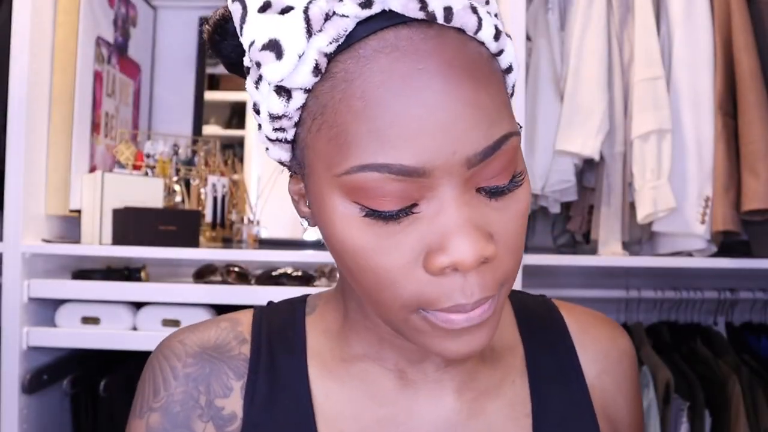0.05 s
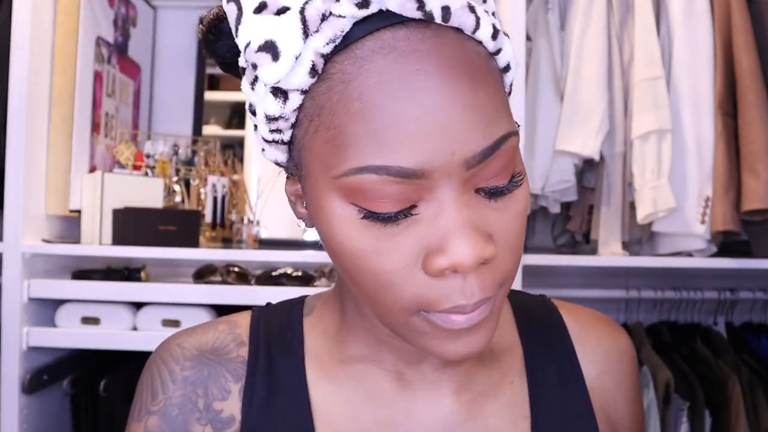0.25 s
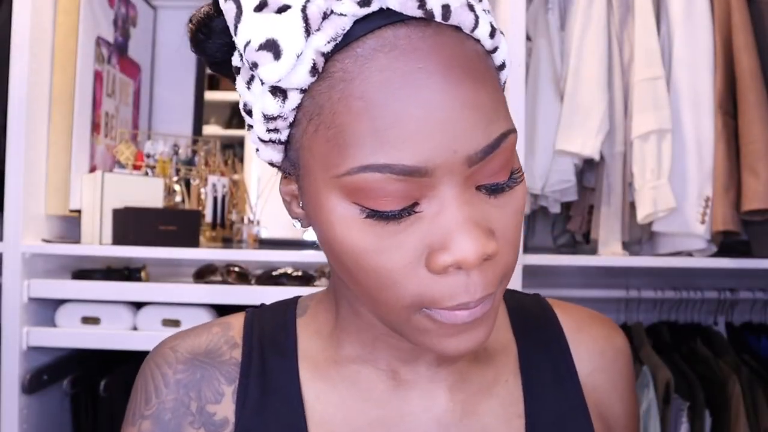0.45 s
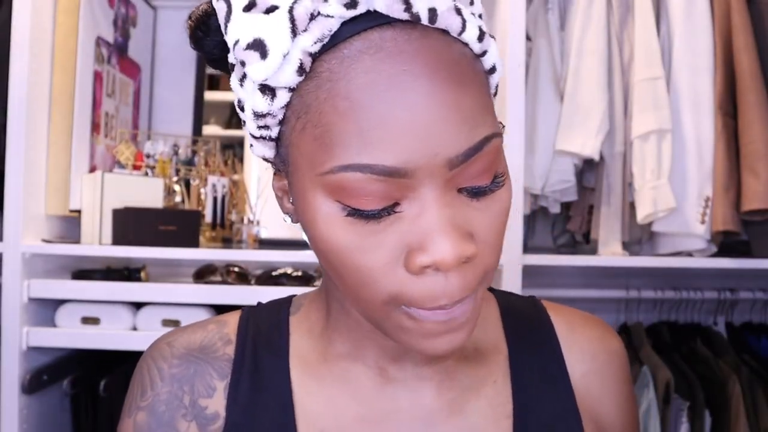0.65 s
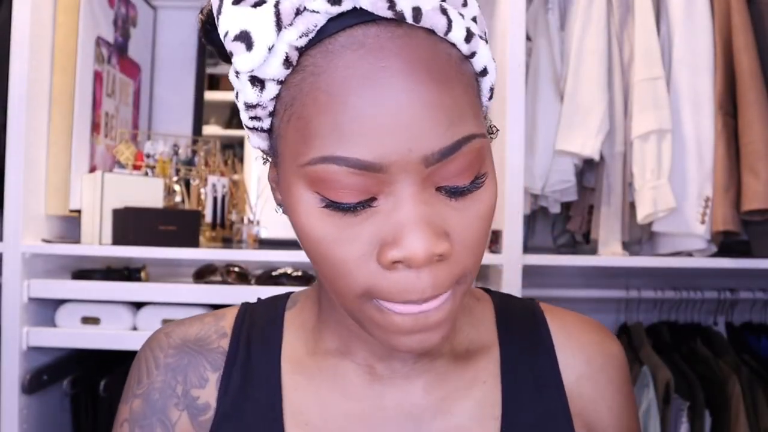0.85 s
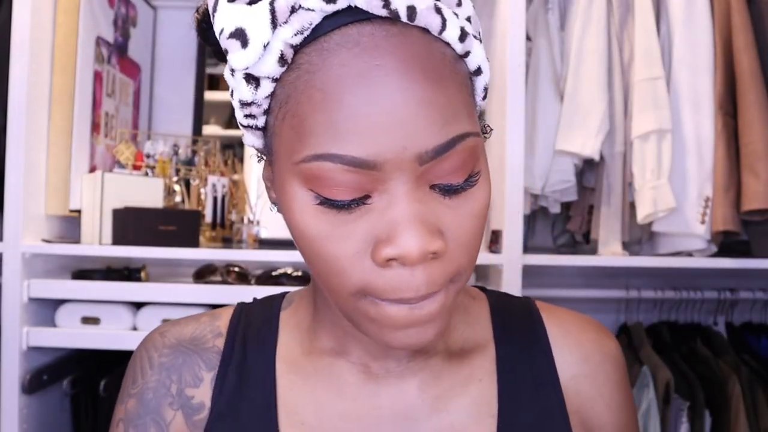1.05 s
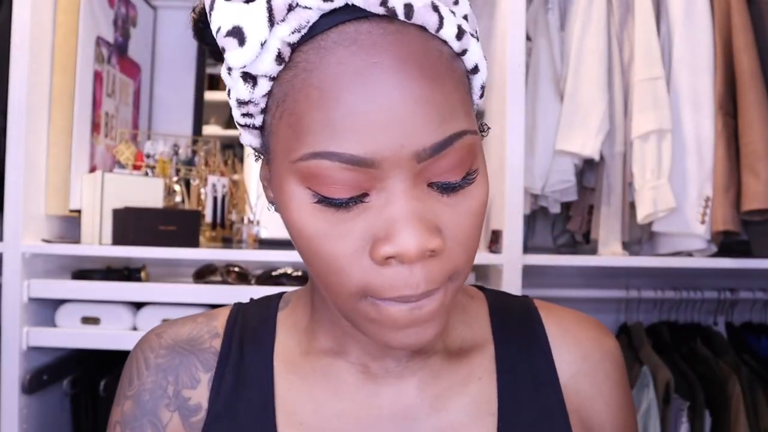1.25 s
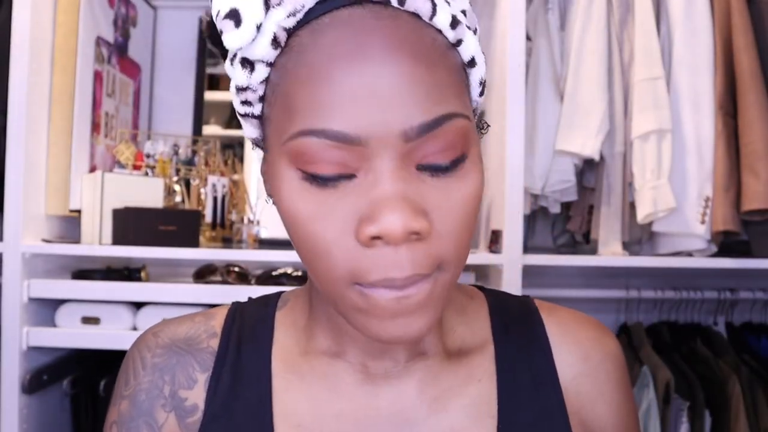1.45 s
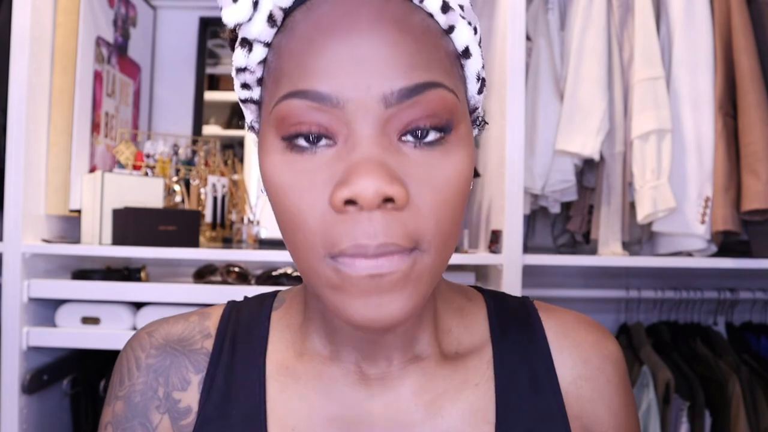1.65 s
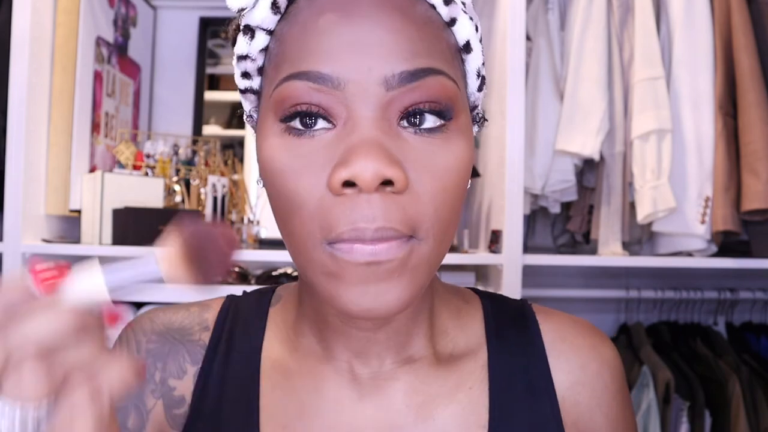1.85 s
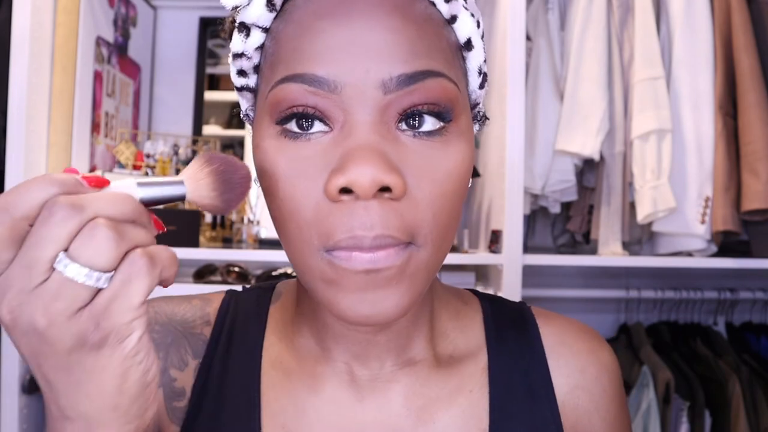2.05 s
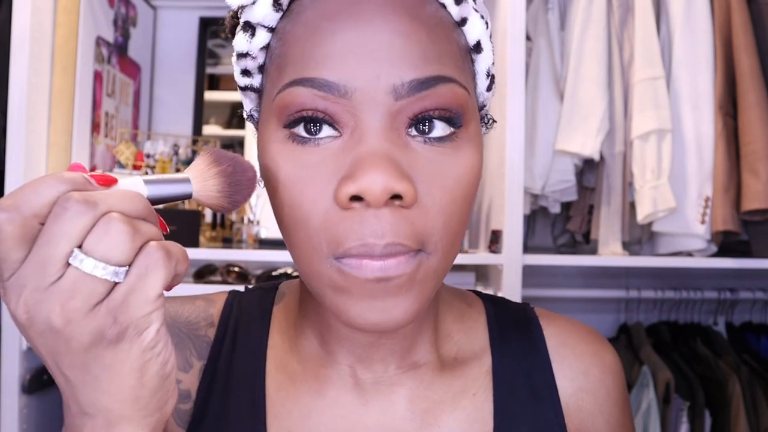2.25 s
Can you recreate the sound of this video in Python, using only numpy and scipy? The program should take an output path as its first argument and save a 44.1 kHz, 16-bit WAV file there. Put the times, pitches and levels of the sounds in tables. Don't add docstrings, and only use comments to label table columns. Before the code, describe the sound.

A plastic compact clatters on a hollow tabletop close to wide stereo microphones: light taps at 0.03-0.07 s, a sharp knock at 0.19, then a dense, loud, clipping rattle from 0.22 to 0.33. A soft knock settles at 0.39. Lid ticks follow at 0.55 and 0.66. Very faint brush sweeps run 0.9-1.8, a faint tick at 1.76, sleeve rustle near 1.9, over quiet furnished-room hum.

```python
import sys
import numpy as np
from scipy import signal
from scipy.fft import rfft, irfft
from scipy.io import wavfile

SR = 44100
rng = np.random.default_rng(int(sys.argv[2]) if len(sys.argv) > 2 else 0)


def level_to_linear(level):
    exponent = np.asarray(level, float) / 20
    return 10 ** exponent


def bounce(signal):
    frames = np.transpose(np.atleast_2d(signal))
    limited = np.clip(frames, -1, 1)
    pcm = np.round(limited * 32767).astype(np.int16)
    wavfile.write(sys.argv[1], SR, pcm)


N = 101121


def rms_one(x):
    return x / np.sqrt(np.mean(x ** 2) + 1e-20)


def at_hz(points, hz):
    table_hz, value = np.transpose(points)
    return np.interp(np.log(np.maximum(hz, 1)), np.log(table_hz), value)


def colour(x, spectrum):
    size = 4096
    log_gain = at_hz(spectrum, np.arange(size // 2 + 1) * SR / size) * np.log(10) / 20
    cepstrum = irfft(log_gain)
    cepstrum[1:size // 2] *= 2
    cepstrum[size // 2 + 1:] = 0
    kernel = irfft(np.exp(rfft(cepstrum)))
    kernel = kernel / np.sqrt(np.sum(kernel ** 2))
    return signal.fftconvolve(x, kernel)[:len(x)]


def filtered(x, order, hz, kind):
    return signal.sosfilt(signal.butter(order, hz, kind, fs=SR, output="sos"), x)


def add(out, s, x):
    i = max(int(s * SR), 0)
    out[i:i + len(x)] += x[:len(out) - i]


def swells(rows):
    t = np.arange(N) / SR
    power = sum(level_to_linear(db) ** 2 * np.exp(-((t - s) / (length / 2)) ** 2) for s, length, db in rows)
    return np.sqrt(power)


def ring(x, hz, t60):
    r, w = level_to_linear(-60 / (t60 * SR)), 2 * np.pi * hz / SR
    return signal.lfilter([0, np.sin(w)], [1, -2 * r * np.cos(w), r * r], x + 1e-18)


def struck(hits, modes):
    spread_db, longest_ring_s, push_hz = 2, 0.24, 1600
    shape = (len(hits), len(modes))
    spread, late = rng.standard_normal(shape), rng.random(shape)
    s, db = np.transpose(hits)
    out = 0
    for k, (hz, level_db, t60) in enumerate(modes):
        force = np.zeros(N)
        at = ((s + late[:, k] / hz) * SR).astype(int)
        np.add.at(force, at, level_to_linear(db + level_db + spread_db * spread[:, k]))
        out = out + ring(force, hz, min(t60, longest_ring_s))
    return filtered(out, 2, push_hz, "low")


def contact(length_s, fall_s, spike_db):
    first_touch, sag_s = 2.5, 0.008
    t = np.arange(1024) / SR
    spikes = level_to_linear(spike_db * rng.standard_normal(len(t) // 16).repeat(16))
    grit = rng.standard_normal(len(t)) * spikes
    grit[0] = first_touch
    return grit * np.exp(-t / sag_s - np.maximum(t - length_s, 0) / fall_s)


def hum():
    # frequency in Hz, level in dB per Hz.
    mid_tone = [(12, -27), (20, -9), (50, -2.5), (319, -10), (398, -11), (484, -11.5), (753, -15),
                (6720, -33), (15000, -57.5)]
    # frequency in Hz, level in dB per Hz.
    side_tone = [(12, -50.5), (20, -12), (286, 0), (603, -3), (796, -3), (5240, -17.5), (11100, -27.5),
                 (13100, -30.5), (15000, -55.5)]
    mid_db, side_db, patchy_db = -61.5, -61, 0.3
    lumps = np.interp(np.arange(N), np.linspace(0, N, 40), rng.standard_normal(40))
    tones = []
    for spectrum, db in [(mid_tone, mid_db), (side_tone, side_db)]:
        noise = rng.standard_normal(N + 4096)
        settled = colour(noise, spectrum)[4096:]
        tones.append(level_to_linear(db) * rms_one(settled))
    return level_to_linear(patchy_db * lumps) * np.array(tones)


def room(x):
    # frequency in Hz, t60 in seconds.
    decay = [(200, 0.15), (1000, 0.23), (4000, 0.16), (12000, 0.12)]
    # frequency in Hz, level in dB.
    tint = [(200, -5), (700, -7.5), (2000, -1.5), (4000, -0.5)]
    level_db, rise_s, early_db, early_s = -10, 0.004, 1, 0.002
    t = np.arange(SR // 2) / SR
    out = []
    for _ in range(2):
        tail = 0
        for hz in 125 * 2. ** np.arange(8):
            edges = [hz / np.sqrt(2), min(hz * np.sqrt(2), .45 * SR)]
            band = filtered(rng.standard_normal(len(t)), 2, edges, "band")
            tail = tail + band * level_to_linear(at_hz(tint, hz) - 60 * t / at_hz(decay, hz))
        tail = tail * (1 - np.exp(-t / rise_s)) * (1 + level_to_linear(early_db) * np.exp(-t / early_s))
        tail = tail / np.sqrt(np.sum(tail ** 2))
        out.append(level_to_linear(level_db) * signal.fftconvolve(x, tail)[:N])
    return np.array(out)


def sleeve():
    # frequency in Hz, level in dB per Hz.
    cloth = [(600, -24), (1500, -4.5), (2500, 0), (4000, -14.5), (8000, -35)]
    swell = swells([(1.92, 0.36, -69.5)])
    return swell * np.array([rms_one(colour(noise, cloth)) for noise in rng.standard_normal((2, N))])


def leftover():
    # frequency in Hz, level in dB, t60 in seconds.
    rings = [(70, -60, 0.038), (194, -26.5, 0.093), (394, -46, 0.19), (794, -44, 0.17)]
    age_s = 0.0006
    t = np.arange(N) / SR + age_s
    return sum(level_to_linear(db - 60 * t / t60) * np.sin(2 * np.pi * hz * t) for hz, db, t60 in rings)


def bump():
    at_s, hz, level_db = 0.48, 40, -50
    cycles = (np.arange(N) / SR - at_s) * hz
    return level_to_linear(level_db) * np.sin(2 * np.pi * cycles) * np.exp(-2 * cycles ** 2)


def hollow_top():
    # start in seconds, level in dB.
    taps = [
        (0.041, -36.5),
        (0.062, -45.5),
    ]
    # frequency in Hz, level in dB, t60 in seconds.
    hollow = [(427, -0.5, 0.135), (810, -12, .22)]
    return struck(taps, hollow)


def finger_drag():
    # centre in seconds, length in seconds, level in dB rms.
    drags = [
        (0.01, .03, -54),
        (0.063, .05, -64.5),
        (0.132, .06, -60.5),
        (0.21, .025, -50),
        (0.294, .04, -39.5),
        (0.309, .012, -38.5),
    ]
    # frequency in Hz, level in dB per Hz.
    skin = [(500, -13), (1200, -2), (2500, 0), (4200, 2.5), (6000, -9.5), (12000, -18.5), (15000, -35)]
    side_db = 4.5
    slips = rng.standard_normal((2, N)) * (.3 + 2 * (rng.random((2, N)) < .05))
    mid, side = (swells(drags) * rms_one(colour(grit, skin)) for grit in slips)
    return np.array([mid, level_to_linear(side_db) * side])


def brush():
    # centre in seconds, length in seconds, level in dB rms.
    strokes = [
        (0.89, .05, -74),
        (1.11, .07, -71),
        (1.295, .07, -68),
        (1.36, .06, -73),
        (1.48, .06, -71),
        (1.695, .06, -72),
        (1.8, .08, -75),
    ]
    # frequency in Hz, level in dB.
    bristle = [(2500, -20), (4500, -4), (6000, 0), (9000, 0), (12000, -3), (13500, -12), (15000, -25)]
    flicks_per_s, mid_db, side_db = 7300, -12, 0
    flicks = rng.standard_normal((2, N)) * (0.21 + (rng.random((2, N)) < flicks_per_s / SR))
    mid, side = (rms_one(colour(f, bristle)) for f in flicks)
    return swells(strokes) * np.array([level_to_linear(mid_db) * mid, level_to_linear(side_db) * side])


def ticks():
    # start in seconds, peak in dB, centre in Hz, grit in dB.
    snaps = [
        (0.5451, -28, 10480, -7),
        (0.6599, -18, 5500, -21),
        (1.7623, -33, 6000, -17),
    ]
    # frequency in Hz, level in dB, t60 in seconds.
    lid = [(2250, -21, 0.015), (2550, -21, .012)]
    low_hz, width_octaves, fall_s = 2000, 1.1, 0.0018
    echo_s, echo_db = 0.0072, -19
    out = np.zeros(N)
    for s, db, hz, grit_db in snaps:
        kick = np.r_[1., np.zeros(3071)]
        grit = np.r_[contact(.0005, fall_s, 3), np.zeros(2048)]
        band = [(hz / 2 ** (3 * width_octaves), -10), (hz, 0), (14000, -4), (16000, -12)]
        snap = colour(kick + level_to_linear(grit_db) * grit, sorted(band))
        snap = snap / np.max(np.abs(snap))
        snap = snap + sum(level_to_linear(level_db) * ring(kick, f, t60) for f, level_db, t60 in lid)
        snap = level_to_linear(db) * filtered(snap, 4, low_hz, "high")
        add(out, s, snap)
        add(out, s + echo_s, level_to_linear(echo_db) * snap)
    return out


def crack(db, length_s):
    # frequency in Hz, level in dB per Hz.
    bright = [(880, -38), (1500, -9.5), (1750, -10), (4240, -1), (4860, -0.5), (7850, -4), (11500, -3),
              (15600, -24.5)]
    fall_s, spike_db, tint_db = 0.001, 2.5, 1.5
    dull_db = 0.9 * 1000 * length_s - 0.14 * db
    tint = []
    for hz, level in bright:
        level = level + tint_db * rng.standard_normal()
        tint.append((hz, level - dull_db * max(np.log2(hz / 4000), 0)))
    x = colour(contact(length_s, fall_s, spike_db), tint)
    return level_to_linear(db - 6.0) * x / np.max(np.abs(x))


def knocks():
    # start in seconds, crack peak in dB, low ring in dB, high ring in dB, contact in seconds.
    hits = [(0.0002, -37.5, -59, -64, 0.02), (0.0345, -24, -41, -49.5, 0.004),
            (0.0367, -24.5, -49, -51.5, 0.006), (0.0412, -29, -40.5, -48, 0.012),
            (0.0455, -34.5, -47.5, -56, .004), (0.054, -38, -45, -47, .006), (0.073, -46.5, -45, -55, .012),
            (0.1227, -55, -59, -55.5, 0.0054), (0.1336, -49.5, -56, -58.5, 0.012),
            (0.168, -51, -59, -60, .001), (0.1928, -16, -40, -51.5, 0.0042),
            (0.2002, -31.5, -44.5, -54.5, 0.0011), (0.207, -32, -50, -56, .001),
            (0.2236, -22, -31.5, -34, .0015), (0.2279, -27, -43, -46.5, .0005),
            (0.231, -20.5, -39.5, -52.5, .0015), (0.2407, -25.5, -37, -45, .001),
            (0.2448, -6, -29.5, -23, 0.003), (0.2497, -5.5, -32.5, -23, 0.0015),
            (0.2520, -6.5, -33, -29.5, 0.0037), (0.2561, -1, -26, -25.5, 0.0018),
            (0.2595, -5.5, -36, -35, 0.001), (0.2632, -13, -35.5, -35.5, 0.00097),
            (0.2662, -15, -33, -39, 0.0028), (0.2684, -16.5, -40.5, -46.5, .003),
            (0.2804, -20.5, -42.5, -52, 0.0017), (0.2833, -11.5, -30, -42, .003),
            (0.2930, -26.5, -35.5, -42, 0.0022), (0.2978, -9.5, -36, -44, .0012),
            (0.3000, -12, -41, -48, .0012), (0.3148, -1, -18, -19, 0.0027),
            (0.322, -14.5, -35.5, -30, .001), (0.327, -19.5, -38, -43, .001),
            (0.332, -25.5, -42, -54, 0.004), (0.358, -43.5, -32.5, -35, 0.005)]
    # frequency in Hz, level in dB, t60 in seconds.
    case = [(428, -8, 0.08), (452, -4, 0.11), (534, -13, 0.074), (614, -7, 0.06), (666, -2.5, 0.046)]
    # frequency in Hz, level in dB, t60 in seconds.
    shell = [(761, -8.5, 0.028), (887, -6.5, 0.055), (1046.4, -6, .05), (1184, -6, 0.034), (1207, 0, 0.032),
             (1434, -9, 0.02967), (1770, -5.5, 0.057), (2030, -8, 0.019), (2266, -1, 0.036)]
    # start in seconds, level in dB.
    thuds = [
        (0.043, -44),
        (0.125, -46.5),
        (0.2234, -42.5),
        (0.2443, -25.5),
        (0.2558, -29.5),
        (0.3137, -37.5),
    ]
    # frequency in Hz, level in dB, t60 in seconds.
    table_top = [(182, 0.5, 0.14), (194, 1, 0.043), (247.8, -17, 0.1)]
    # start in seconds, level in dB.
    settle = [
        (0.3925, -32.5),
    ]
    # frequency in Hz, level in dB, t60 in seconds.
    settle_ring = [(435.7, -2.5, 0.19), (525, -8.5, 0.17), (694, 1, 0.037), (1173, -2.5, 0.045)]
    out = np.zeros(N)
    for s, db, _, _, length_s in hits:
        add(out, s, crack(db, length_s))
    s, _, low_db, high_db, _ = np.transpose(hits)
    out = out + struck(np.c_[s, low_db], case) + struck(np.c_[s, high_db], shell)
    return out + struck(thuds, table_top) + struck(settle, settle_ring)


def ports(x):
    loose_above_hz, widen_db, lean_gain, loose_db = 1500, 13, 0.39, 1
    slope = np.convolve([-.5, 0, .5], [1, 4, 6, 4, 1]) / 16
    lean = np.array([0, 0, 1, -2, 1, 0, 0])
    echoes = rng.standard_normal(128) * np.exp(-np.arange(128) / 25.0)
    echoes = echoes / np.sqrt(np.sum(echoes ** 2))
    loose = filtered(np.convolve(x, echoes)[:N], 2, loose_above_hz, "high")
    return np.convolve(x, level_to_linear(widen_db) * slope + lean_gain * lean, "same") + level_to_linear(loose_db) * loose


def scene():
    # frequency in Hz, level in dB.
    side_tint = [(300, -2), (1000, -1), (2000, 1), (4500, -1), (8000, -0.5), (13000, -2)]
    side_db, room_side_db, low_cut_hz = -1, -0.8, 172
    near = knocks() + ticks()
    wet_mid, wet_side = room(near)
    difference = ports(near) + level_to_linear(room_side_db) * ports(wet_side)
    hits = np.array([near + wet_mid, level_to_linear(side_db) * colour(difference, side_tint)])
    hits = filtered(hits, 6, low_cut_hz, "high")
    mid, side = hits + brush() + sleeve() + hum() + finger_drag()
    mid = mid + bump() + hollow_top() + leftover()
    return np.array([mid + side, mid - side])


def band_limit(x):
    return signal.sosfilt(signal.butter(12, 15740, fs=SR, output="sos"), x)


def record(dry):
    top_cut = signal.cheby2(10, 50, 15750, fs=SR, output="sos")
    mix = np.clip(signal.sosfilt(top_cut, dry), -1.0, 1.0)
    return band_limit(mix)


dry = scene()
out = record(dry)
bounce(out)
```